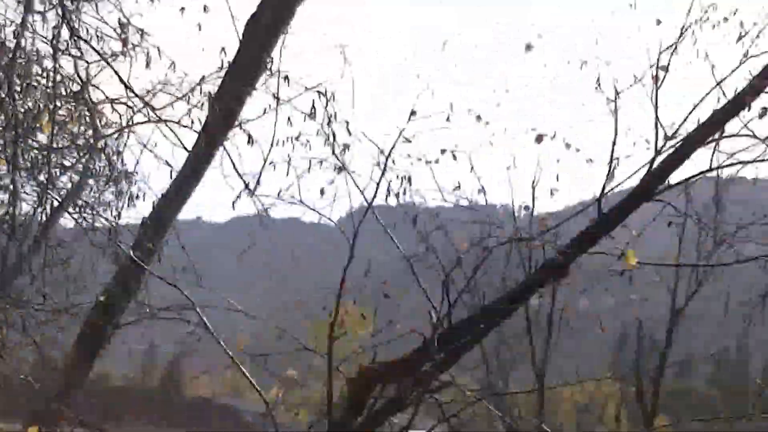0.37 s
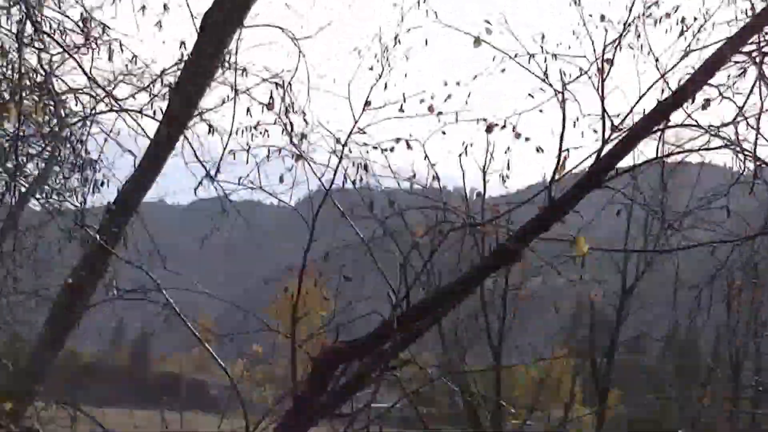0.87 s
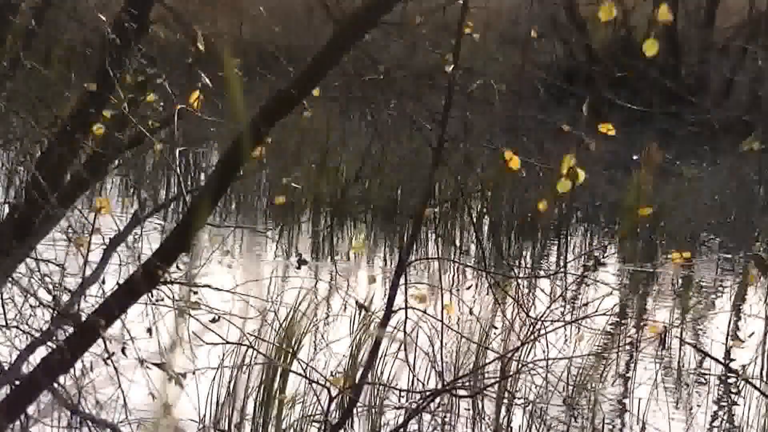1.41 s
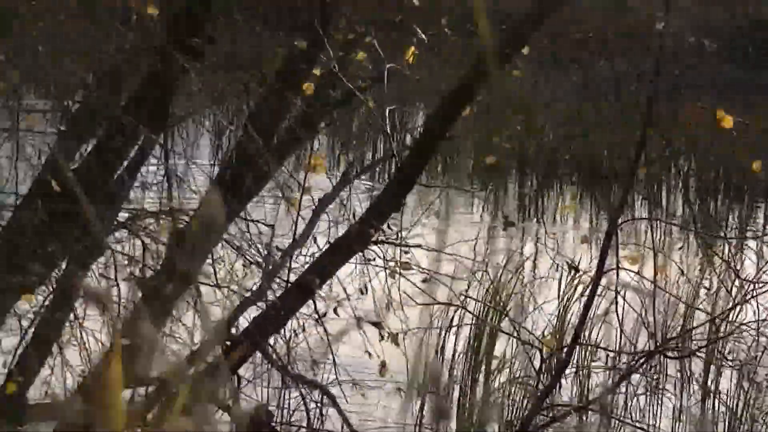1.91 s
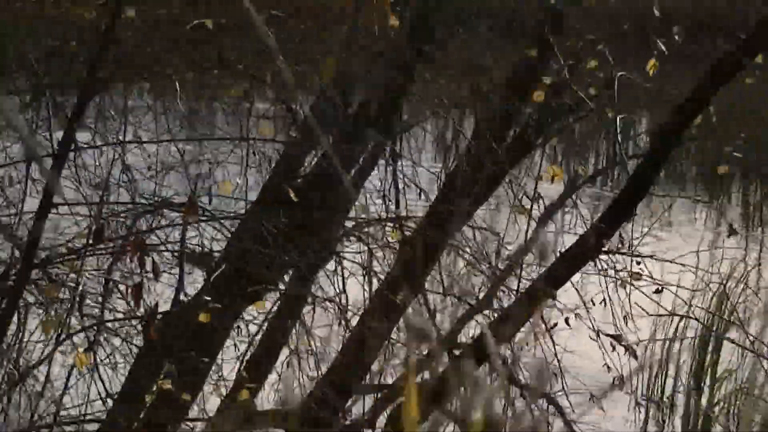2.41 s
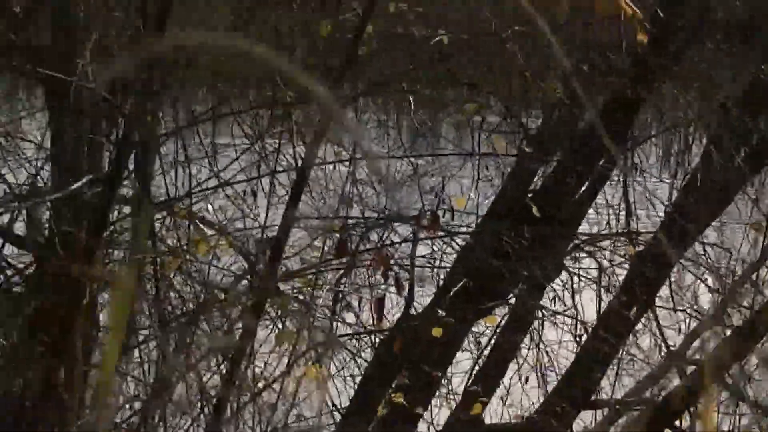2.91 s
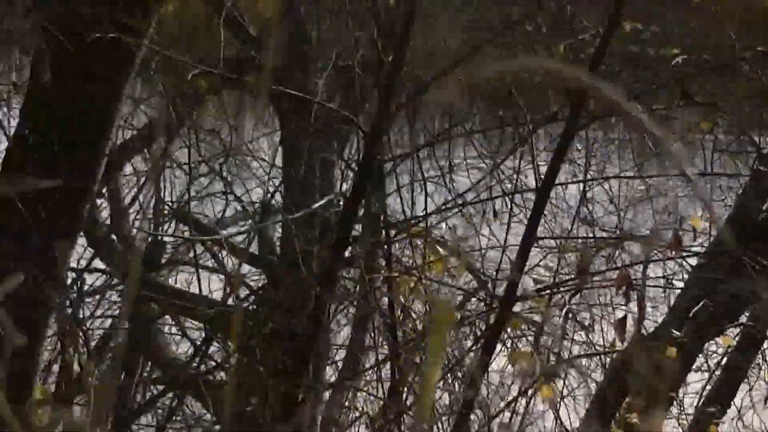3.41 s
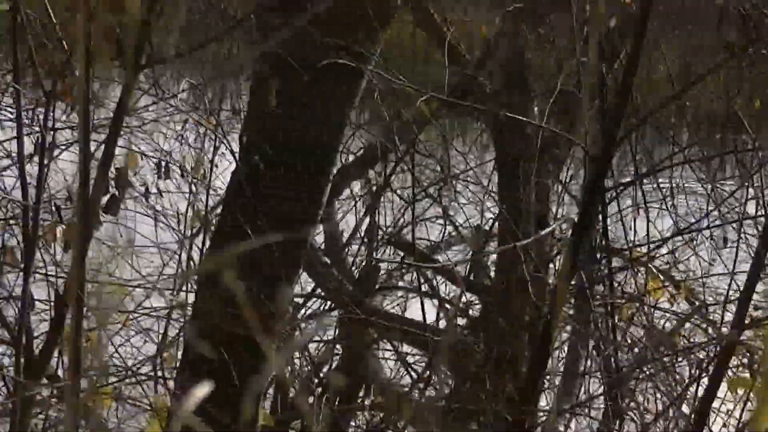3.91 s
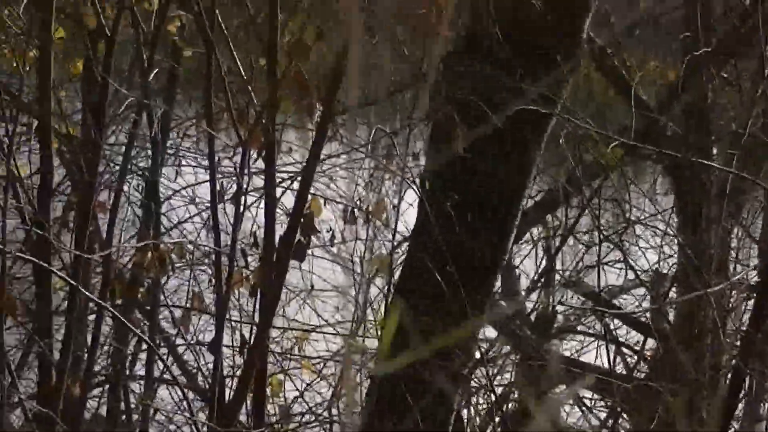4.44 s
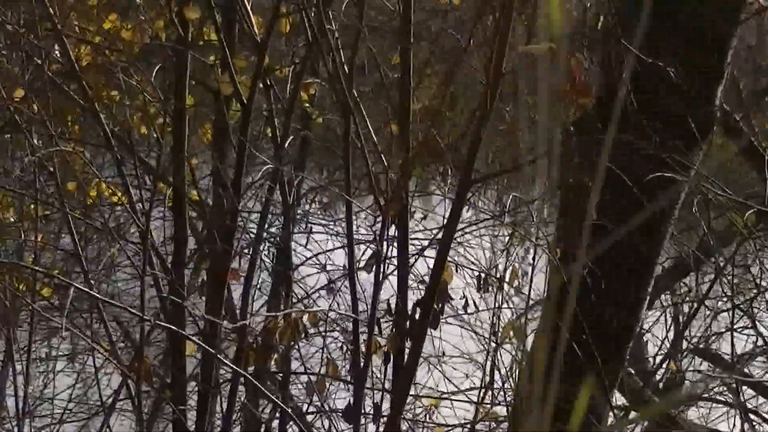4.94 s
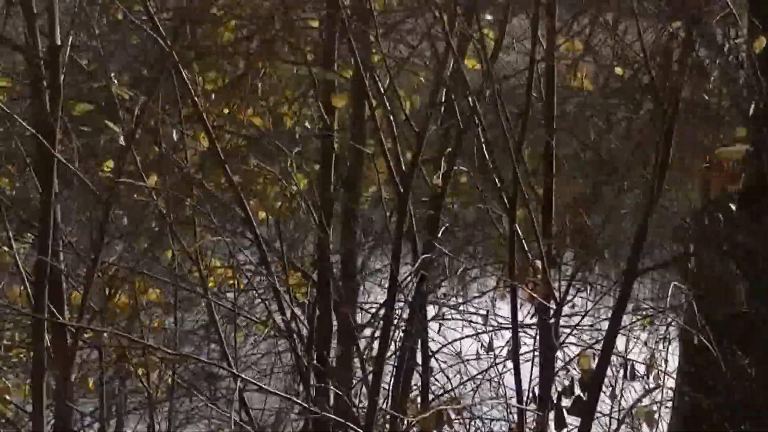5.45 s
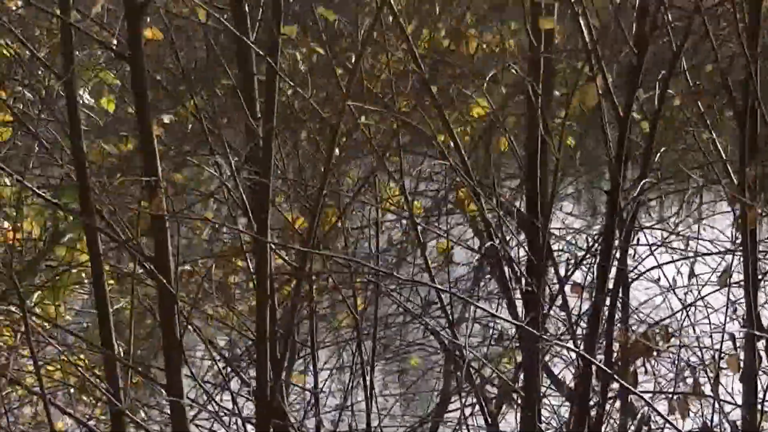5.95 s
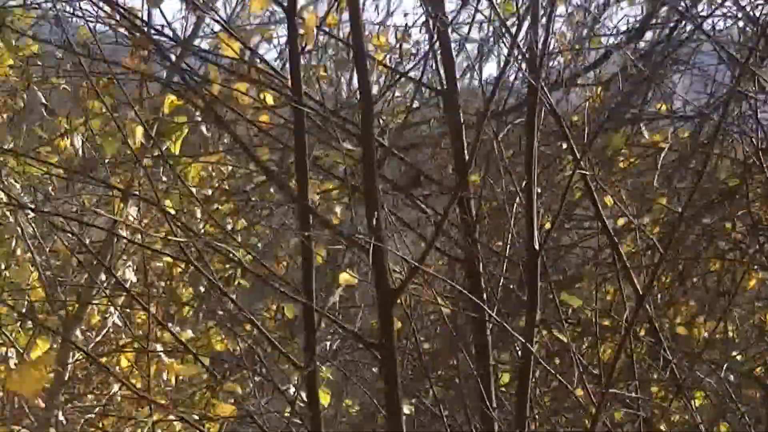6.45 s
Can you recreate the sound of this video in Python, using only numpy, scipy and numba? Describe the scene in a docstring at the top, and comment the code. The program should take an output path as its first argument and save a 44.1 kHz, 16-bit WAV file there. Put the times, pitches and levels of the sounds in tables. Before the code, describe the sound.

Low watery blips and brushing leaves, a few hoarse duck quacks, thin distant birdsong, and finally a close burst of crackling leaves and twigs.

```python
"""A walker pushes through dry brush beside a pond, over the hush of the valley: filtered noise and clicks.
At first low blips, perhaps splashes, ring in damped modes; low hollow pips tick ten a second as tone bursts,
then a duck gives short rasping quacks, pulses ringing throat and bill. A songbird follows with faint gliding
sines; at the end leaves rustle loudest, twigs snap in damped modes and a low thump sounds close by."""
import sys
import numpy as np
from scipy import signal
from scipy.fft import rfft, irfft
from scipy.io import wavfile
from scipy.ndimage import uniform_filter1d
from numba import njit

SR = 44100
rng = np.random.default_rng(int(sys.argv[2]) if len(sys.argv) > 2 else 0)


def transcribe(signal):
    """Save signal, clipped to [-1, 1], as a 16-bit WAV file at the path in sys.argv[1]."""
    frames = np.atleast_2d(signal).T
    limited = np.clip(frames, -1, 1)
    pcm = np.round(limited * 32767).astype(np.int16)
    wavfile.write(sys.argv[1], SR, pcm)


def field_ratio(decibels):
    """Amplitude ratio for a level in dB (20 dB per decade); scalars and array-likes work."""
    return 10 ** (np.asarray(decibels, dtype=float) / 20)


N = 290206  # samples
T = np.arange(N) / SR  # s


def at(table, hz):
    """Logarithmic frequency scale: reads a (f/Hz, level/dB) table."""
    f, db = np.transpose(table)
    return np.interp(np.log(hz), np.log(f), db)


def colour(x, table):
    """Spectral shaping: filters by a (f/Hz, level/dB) table without phase shift."""
    return irfft(rfft(x) * field_ratio(at(table, np.fft.rfftfreq(len(x), 1 / SR) + 1)), len(x))


def unit(x):
    """Normalization of power: scales to rms 1."""
    return x / np.sqrt(np.mean(x ** 2))


def band(x, lo_hz, hi_hz):
    """Band-pass filtering by a Butterworth response."""
    sos = signal.butter(2, [lo_hz, min(hi_hz, .45 * SR)], "band", fs=SR, output="sos")
    return signal.sosfilt(sos, x)


@njit
def resonate(x, hz, width):
    """Resonance: a state-variable band-pass with moving centre and width in Hz, gain 1 at the centre."""
    y, b, l = np.empty(len(x)), 0., 0.
    for i in range(len(x)):
        g, k = np.tan(np.pi * hz[i] / SR), width[i] / hz[i]
        v = (b + g * (x[i] - l)) / (1 + g * (g + k))
        b, l, y[i] = 2 * v - b, l + 2 * g * v, k * v
    return y


def walk(rate):
    """Slow random fluctuation: levels held 1 / rate s and slewed, rms 1."""
    k = int(SR / rate)
    held = np.repeat(rng.standard_normal(N // k + 1), k)
    return unit(uniform_filter1d(uniform_filter1d(held, k), k)[:N])


def add(out, s, x):
    """Superposition: mixes x into out from time s."""
    i = int(s * SR)
    out[i:i + len(x)] += x[:N - i]


def span(rows, fade_s):
    """Piecewise-linear contour: columns of a note at every sample, and a fade at both ends."""
    s, *columns = np.transpose(rows)
    t = np.arange(s[0], s[-1], 1 / SR)
    fade = np.clip(np.minimum(t - s[0], s[-1] - t) / fade_s, 0, 1)
    return [np.interp(t, s, c) for c in columns], fade


def scatter(x, t60):
    """Diffuse reflection off trunks, reeds and water: a decaying noise response of energy 1."""
    t = np.arange(int(t60 * SR)) / SR
    tail = rng.standard_normal(len(t)) * field_ratio(-60 * t / t60)
    return signal.fftconvolve(x, tail / np.sqrt(np.sum(tail ** 2)))[:N]


def crackle(rate, spread_db, top_db):
    """Random impulse process: clicks at a mean rate per s, mostly small and a few large, rms 1."""
    hit = rng.random(N) < rate / SR
    size = field_ratio(np.minimum(spread_db * rng.exponential(size=N), top_db))
    return unit(hit * rng.standard_normal(N) * size)


# spectrum of distant wind and water: f/Hz, relative level/dB per Hz
VALLEY_COLOUR = [(82, -62), (140, -5.5), (239, -4.5), (393, -7.5), (508, -1), (921, 0), (1510, -7.5),
                 (3480, -11), (4410, -11.5), (5070, -18), (10800, -28), (14200, -42), (16000, -57)]
VALLEY_DB = -56.5


def valley():
    """Broadband noise of distant wind and water: a smooth hush that drifts a little."""
    return field_ratio(VALLEY_DB + 0.34 * walk(2.72)) * unit(colour(rng.standard_normal(N), VALLEY_COLOUR))


LEAF_DB, STEM_DB = 1.5, 8.5  # balance of leaves and stems against treble at which the tilt is flat
AIR_DB, AIR_DB_PER_STEM_DB = -13.5, -0.5  # top octave, duller with thick stems


def brush_power(hz, leaf_db, stem_db):
    """Spectral balance: power in one band as stems (low), leaves (3.5 kHz) and the top octave count in it."""
    low = np.clip(np.log2(3500 / hz) / np.log2(3500 / 1200), 0, 1)
    top = np.clip(np.log2(hz / 3500), 0, 1)
    air = np.clip(np.log2(hz / 8000) / np.log2(12000 / 8000), 0, 1)
    tilt_db = low * (stem_db - STEM_DB) + (1 - low - top) * (leaf_db - LEAF_DB)
    return field_ratio(2 * (tilt_db + air * (AIR_DB + AIR_DB_PER_STEM_DB * stem_db)))


# spectrum of rustling leaves: f/Hz, relative level/dB per Hz
LEAF_COLOUR = [(180, -57), (300, -22), (337, -13), (614, -8.5), (774, 0.5), (1300, -1.5), (2360, -2.5),
               (2610, -7), (6620, -14.5), (14200, -27.5), (16000, -55)]
# steady brushing of the legs through the stems: t/s, relative treble level/dB,
# balance of thick stems near 1 kHz against treble/dB
WADING = [(0.0, -59, 13.5), (0.2, -64, 15.5), (0.44, -67.5, 16.5), (0.7, -65, 17.5), (0.95, -66.5, 8.5),
          (1.3, -68.5, 10.5), (1.7, -67.5, 2.5), (2.5, -66.5, 6.5), (2.7, -75, 3), (3.5, -89, 12),
          (4.0, -79.5, 20), (5.3, -89, -5), (5.6, -65, -7), (6.0, -61.5, 6), (6.15, -52, 8), (6.35, -52, 4),
          (6.44, -59.5, 4.5), (6.58, -66.5, 12)]
# single sweeps through the leaves: peak t/s, length/s, relative treble level/dB,
# balance of leaves near 3.5 kHz against treble/dB, balance of thick stems against treble/dB
SWEEPS = [(0.083, 0.12, -63.5, 18.5, 12), (0.13, 0.12, -67, 17, 21), (0.243, 0.12, -69.5, 13, 20),
          (0.317, 0.1, -68.5, 21, 21.5), (0.42, 0.18, -69.5, 18.5, 21.5), (0.51, 0.16, -56.5, 4.5, -2),
          (0.598, 0.1, -62, 9, 3), (0.744, 0.052, -65.5, 0, 25.5), (0.785, 0.058, -69, 0, 23),
          (0.908, .06, -61, -8, 6), (0.987, 0.096, -57, -10, 5), (1.27, 0.15, -62, 7.5, 7),
          (1.43, 0.067, -61.5, -7, -7), (1.505, 0.12, -60.5, -16, -9), (1.877, 0.039, -60.5, 5, -4),
          (1.919, 0.11, -57.5, 7.5, -1.5), (2.074, 0.094, -65, 5, 4), (2.11, 0.075, -71.5, -17, 20),
          (2.182, 0.23, -67.5, -27, 18), (2.34, 0.074, -68, 23, -2), (2.537, 0.11, -63.5, 11.5, -7),
          (2.872, 0.081, -65.5, 12.5, -18), (3.015, 0.13, -68.5, 13.5, -8), (3.074, 0.11, -60, 12.5, -14),
          (3.129, 0.094, -65.5, 16, -14), (3.453, 0.059, -57, 1, -15), (3.607, 0.51, -65.5, 2.5, 0.5),
          (3.768, .15, -69, 2, -6), (4.073, 0.096, -66, 14, -1), (4.234, 0.21, -73.5, 1, 21.5),
          (4.343, 0.13, -69.5, 13, 0), (4.646, 0.16, -63, 8, -10), (4.943, 0.21, -67.5, 2, 6),
          (5.438, 0.23, -60.5, 7, -0.5), (5.478, 0.086, -57.5, 7.5, 0), (5.515, 0.13, -65.5, 6.5, -10),
          (5.666, 0.057, -82, 9, -5), (5.774, 0.11, -50.5, 8.5, -0.5), (5.828, 0.036, -45, 2, -1),
          (5.955, 0.12, -51.5, 5, -4), (6.066, 0.11, -43, 4, 2.5), (6.132, 0.18, -40.5, 5, 4),
          (6.165, 0.062, -41, 5, 5), (6.209, 0.072, -40, 2, 0.5), (6.255, 0.023, -39, 2, -3),
          (6.303, 0.079, -46, -6, -6), (6.378, 0.023, -35.5, -24, -6.5), (6.485, 0.07, -48, 0, 3.5),
          (6.521, 0.05, -48, -5, 1.5), (6.548, .06, -55, 4, 9)]
SWEEP_RISE_SHARE = 0.49  # share of the length spent swelling
SWEEP_DEPTH_DB = 14.5  # how far below its peak a sweep starts and ends
WADING_LEAF_DB, BITS_OVER_HISS = 6, .8  # leaves against treble; amplitude ratio above 800 Hz


def brush():
    """Frictional noise and random impulses: leaves hiss and crackle, in all bands at once or only in one."""
    t = T[::32]
    s, wade_db, wade_stem_db = np.transpose(WADING)
    peak_s, length, db, leaf_db, stem_db = np.transpose(SWEEPS)[:, :, None]
    rising = (peak_s - t) / SWEEP_RISE_SHARE
    falling = (t - peak_s) / (1 - SWEEP_RISE_SHARE)
    away = np.maximum(rising, falling) / length
    sweeps = field_ratio(2 * (db - SWEEP_DEPTH_DB * away))
    wade = field_ratio(2 * np.interp(t, s, wade_db))
    stem_now_db = np.interp(t, s, wade_stem_db)
    wide = crackle(rate=1100, spread_db=9.0, top_db=23)
    surge, out = walk(45), 0
    for hz in 180 * 2 ** np.arange(0, 6.6, .5):
        cracks = min(hz / 2500, 1, 6000 / hz) * 0.3 * wide
        hiss = band(0.81 * rng.standard_normal(N) + cracks, hz / 2 ** 0.39, hz * 2 ** 0.29)
        # bits of leaf and stem ring briefly, each on its own pitch; small bits crack higher and more often
        clicks = crackle(rate=.45 * hz, spread_db=5, top_db=12)
        pitch = np.minimum(hz * 2 ** (.2 * walk(150)), .45 * SR)
        bits = band(resonate(clicks, pitch, hz / 9 + 0 * T), hz / 1.43, hz * 1.48)
        grain = unit(hiss) + min(hz / 800, 1) * BITS_OVER_HISS * unit(bits)
        power = wade * brush_power(hz, WADING_LEAF_DB, stem_now_db)
        power = power + np.sum(sweeps * brush_power(hz, leaf_db, stem_db), axis=0)
        # a density per Hz becomes a level per band, which grows with frequency
        colour_db = at(LEAF_COLOUR, hz) + 10 * np.log10(hz / 7000) + 0.93 * surge + 0.84 * walk(25)
        out = out + np.interp(T, t, np.sqrt(power)) * field_ratio(colour_db + 11.0) * unit(grain)
    return out


# low ringing blips before 0.6 s, perhaps splashes, and later snapping twigs: t/s, peak level/dB,
# pitch f/Hz, brightness of the crack/dB (counts twice)
SNAPS = [(0.009, -31, 1080, -21), (0.049, -28.5, 1460, -26), (0.061, -29, 1480, -24),
         (0.066, -26, 1540, -27), (0.07, -26, 1770, -25), (0.075, -28, 1030, -22), (0.083, -30, 1240, -20),
         (0.105, -29, 1290, -26), (0.132, -32, 1430, -22), (0.138, -28, 1870, -27), (0.147, -30, 1240, -26),
         (0.179, -34, 1210, -22), (0.213, -35, 830, -26), (0.244, -36, 1270, -22), (0.274, -36, 842, -20),
         (0.296, -36, 1870, -22), (0.328, -33, 1180, -23), (0.359, -37, 947, -23), (0.431, -31, 1330, -13),
         (0.437, -32, 1190, -21), (0.443, -27.5, 1180, -31), (0.46, -34, 950, -21), (0.554, -37, 1380, -20),
         (0.576, -34, 1880, -21), (0.916, -40, 1500, -20), (2.315, -39, 3280, -19), (3.004, -38, 4470, -18),
         (3.44, -37, 3100, -22), (3.864, -39, 2700, -32), (3.867, -43, 1700, -32), (4.054, -44, 4200, -24),
         (4.065, -42, 3600, -22), (4.074, -39, 3100, -24), (4.676, -46, 3900, -20), (4.916, -39, 2650, -26),
         (4.919, -42, 2300, -26), (5.1, -47, 5200, -18), (5.128, -28, 4240, -16), (5.135, -44, 2800, -18),
         (5.193, -46, 2200, -18), (5.599, -19, 4300, -16), (5.61, -41, 3770, -13), (5.62, -38, 1350, -18),
         (5.636, -42, 821, -7), (5.656, -29, 3470, -17), (5.667, -35, 4080, -16), (5.671, -40, 2910, -14),
         (5.708, -38, 4050, -18), (5.73, -37, 4300, -18), (5.737, -27, 5000, -13), (5.804, -26, 1660, -18),
         (5.825, -31, 1790, -15), (5.85, -35, 1920, -26), (5.853, -37, 2300, -26), (5.865, -40, 2200, -22),
         (5.885, -39, 2260, -20), (5.889, -37, 2300, -26), (5.912, -36, 4100, -18), (5.945, -33, 1860, -15),
         (5.978, -29, 2420, -19), (6.021, -27, 2200, -22), (6.026, -27, 2100, -26), (6.033, -28, 1400, -20),
         (6.046, -26, 4000, -16), (6.056, -23, 1500, -24), (6.059, -17, 1670, -25), (6.075, -20, 1500, -23),
         (6.084, -27, 1500, -20), (6.118, -20, 2520, -16), (6.121, -18, 2600, -22), (6.146, -22, 1800, -20),
         (6.154, -21, 2500, -22), (6.178, -9, 4900, -14), (6.1785, -24, 1300, -20), (6.192, -26, 2460, -12),
         (6.203, -25, 1800, -12), (6.212, -17, 2500, -12), (6.224, -27, 1500, -14), (6.246, -27, 4600, -16),
         (6.252, -19, 2150, -15), (6.256, -24, 2300, -22), (6.267, -26, 1570, -15), (6.281, -28, 1710, -14),
         (6.301, -28, 1670, -17), (6.349, -28, 2440, -15), (6.367, -28, 1900, -8), (6.377, -20, 2370, -16),
         (6.386, -24, 2170, -8), (6.392, -28, 2300, -10), (6.4122, -11, 2500, -16),
         (6.4163, -6.5, 3170, -17), (6.428, -35, 2330, -14), (6.462, -30, 2540, -20)]
# modes of each blip or snap: multiple of its pitch, mean level/dB, share of the ring time
SNAP_MODES = [(.5, -15, 1.4), (.72, -11, 1.0), (1.0, 0, .6), (1.3, -7, .5), (1.7, -10, .4), (2.2, -14, .35)]
RING_CYCLES = 30.0  # cycles at the pitch in 60 dB of decay, before each mode's share
BREAK_CYCLES, BREAK_DB_PER_OCTAVE = 7, 6  # one short pulse at the pitch, stronger in high snaps
CRACK_DB = 17  # added to the brightness of all cracks


def blips_and_snaps():
    """Modal vibration: damped modes ring for a few cycles; a bright crack leads, noisy splinters follow."""
    out, t = np.zeros(N), np.arange(int(.03 * SR)) / SR
    for s, db, hz, crack_db in SNAPS:
        chance = rng.standard_normal(len(t))
        t60 = RING_CYCLES / hz  # higher ones ring shorter
        ring = 0
        for (multiple, mode_db, share), r in zip(SNAP_MODES, chance):
            mode_hz = hz * multiple * (1 + 0.16 * r * abs(multiple - 1))
            ring = ring + field_ratio(mode_db + 2.0 * r - 60 * t / (t60 * share)) * np.sin(2 * np.pi * mode_hz * t)
        ring = ring * -np.expm1(-t * hz / .8)  # the ring builds up within about a cycle
        splinters = unit(band(chance, hz / 1.5, hz * 1.5)) * field_ratio(-13 - 60 * t / (2 * t60))
        high_db = BREAK_DB_PER_OCTAVE * np.log2(hz / 1500)
        give = np.sin(2 * np.pi * hz * t) * field_ratio(-60 * t * hz / BREAK_CYCLES + high_db)
        give = give * -np.expm1(-t * hz / .25)
        crack = np.sin(2 * np.pi * 5200 * t) + 0.45 * np.sin(2 * np.pi * 8300 * t)
        crack = field_ratio(2 * (crack_db + CRACK_DB) + high_db - 60 * t / 0.0016) * crack
        snap = ring / np.abs(ring).max() + splinters + 2 * give + crack
        snap = band(snap, max(700., hz / 2.22), 9800.0)
        add(out, s + .0007, field_ratio(db) * snap / np.abs(snap).max())
    return out


# low hollow pips: t/s (3 ms after the onset), level/dB, f/Hz
PIPS = [(0.212, -50, 415), (0.339, -53, 408), (0.48, -46, 423), (0.584, -46, 433), (0.683, -46, 402),
        (0.772, -43.5, 395), (0.865, -48, 444), (0.964, -46.5, 412), (1.053, -50, 416), (1.155, -46, 422),
        (1.248, -50, 450), (1.344, -59, 480)]


def pips():
    """Tone bursts under a rounded envelope, with a faint octave and narrow-band noise for hoarseness."""
    out, t = np.zeros(N), np.arange(int(.05 * SR)) / SR
    shape = t / 0.0051 * np.exp(1 - t / 0.0049)
    for s, db, hz in PIPS:
        hoarse = unit(band(rng.standard_normal(len(t)), 300., 900.))
        tone = np.sin(2 * np.pi * hz * t) + .3 * np.sin(4 * np.pi * hz * t) + .45 * hoarse
        add(out, s - .003, field_ratio(db) * shape * tone)
    return out


def bill_ring(x, hz, width):
    """Cascaded resonance: two band-passes in series, made up in level for a narrow width/Hz."""
    first = resonate(x, hz + 0 * T, 2 * width + 0 * T)
    return resonate(first, hz + 0 * T, width + 0 * T) * np.sqrt(SR / 1.6 / width)


# bursts of voice, one or two to a quack, each a list of rows: t/s, pulse rate f/Hz, effort level/dB,
# mean bill resonance f/Hz, gape as drive of the upper resonance over the bill level/dB
QUACKS = [
    [(0.636, 179.7, -49, 1680, -3), (0.645, 184, -43.5, 1560, -3), (0.667, 178.3, -41, 1720, -7),
     (0.674, 180, -46, 1850, -3), (0.688, 184, -40.5, 2000, -1), (0.697, 184, -45, 2000, -2),
     (0.705, 191, -67, 1880, 1)],
    [(1.1265, 134.4, -51.5, 1830, -4), (1.148, 136.9, -45.5, 1900, 0.5), (1.164, 139.3, -44, 1990, 0),
     (1.172, 174, -41, 1890, 5), (1.181, 186, -40, 1850, -3), (1.192, 194.5, -38.5, 1840, -3),
     (1.202, 194.6, -43, 1840, -6), (1.213, 194, -39, 1870, -12), (1.23, 191, -57, 1740, 6),
     (1.245, 190, -59, 1760, -1)],
    [(1.659, 119, -47, 2000, -18), (1.68, 119, -45.5, 1770, -20), (1.688, 127.6, -53, 1690, -14),
     (1.712, 131.5, -58, 1740, -14)],
    [(1.726, 175, -51, 1830, -12), (1.742, 173.4, -43, 1860, -11), (1.75, 172.4, -40, 1960, -3),
     (1.757, 172, -43, 1900, -12), (1.763, 171, -53, 1890, -13)],
    [(1.769, 169, -45.5, 1970, -1.5), (1.781, 167, -42, 1930, -26), (1.793, 164, -54, 1820, -12),
     (1.812, 157, -54, 1770, -3)],
    [(2.3835, 118, -56, 2020, -10), (2.392, 121.4, -51, 2020, -10), (2.401, 118, -60, 2020, -5)],
    [(2.413, 121, -46, 1980, -19), (2.422, 123, -56, 1970, -12), (2.436, 122, -57, 1950, -10)],
    [(2.445, 145, -48, 1950, -12), (2.457, 155, -49, 1930, -10), (2.468, 125, -52, 1950, -8),
     (2.476, 185, -47, 1980, -7), (2.484, 180, -46, 1980, -7), (2.492, 140, -49, 1880, -9),
     (2.5, 130, -51, 1900, -7), (2.515, 130, -65, 1900, -4)],
]
# upper resonance of the bill, for each burst of voice: f/Hz
UPPER_HZ = [2260, 2285, 2500, 2580, 2650, 2400, 2460, 2650]
# drive of the throat over the bill at an effort of -45 dB, for each burst of voice: level/dB
THROAT_DB = [-4.5, -8, -8, -5.5, -10, -4, -4, -5]
THROAT_HZ, THROAT_DB_PER_DB = 800, -0.4  # a louder voice hides the throat


def duck():
    """Source and filter: uneven pulses of the voice box ring the throat and two resonances of the bill."""
    s, *columns = np.vstack(QUACKS).T
    rate, db, bill_hz, upper_db = (np.interp(T, s, c) for c in columns)
    voiced = np.any([(T >= rows[0][0]) & (T <= rows[-1][0]) for rows in QUACKS], axis=0)
    burst = np.maximum(np.searchsorted([rows[0][0] for rows in QUACKS], T) - 1, 0)
    throat_db = np.array(THROAT_DB)[burst] + THROAT_DB_PER_DB * (db + 45)
    cycles = np.cumsum(rate * voiced) / SR
    # every burst of voice opens with a pulse
    opened = np.maximum.accumulate(np.where(voiced, 0, cycles))
    starts = np.flatnonzero(np.diff(np.ceil(cycles - opened)) > 0)
    late, uneven = rng.standard_normal((200, 2))[:len(starts)].T
    pulses = np.zeros(N)
    pulses[starts + (.00012 * SR * late).astype(int)] = field_ratio(1.4 * uneven) * np.sqrt(SR / rate[starts])
    air = (pulses + .2 * rng.standard_normal(N) * voiced) * field_ratio(db)
    # a tighter, faster voice rings the bill longer
    bill_width = np.interp(rate, [175, 193], [260, 180])
    bill_hz = bill_hz * (1 + .03 * walk(150))  # the bill trembles from pulse to pulse
    out = bill_ring(air, bill_hz, bill_width)
    out += bill_ring(air * field_ratio(upper_db), np.array(UPPER_HZ)[burst], 1.3 * bill_width)
    out += bill_ring(air * field_ratio(throat_db), THROAT_HZ, 300.0)
    # weak rasp between and above
    out += field_ratio(-8.5) * bill_ring(air, 1330.0, 410.0) + field_ratio(-19.0) * bill_ring(air, 3300.0, 610.0)
    return out + field_ratio(-9) * scatter(out, t60=.08)


# pure songbird slurs: start t/s, length/s, first f/Hz, last f/Hz, rms level at the peak/dB
SLURS = [(1.485, 0.017, 3880, 3543, -58.5), (2.137, 0.042, 4387, 3350, -57.5),
         (3.258, 0.026, 4220, 4452, -63), (3.476, 0.052, 4250, 3200, -59.5),
         (3.609, 0.053, 4290, 2950, -56.5), (3.735, 0.06, 4370, 2960, -56),
         (3.873, 0.052, 4289, 2960, -58.5), (4.26, 0.06, 4130, 3020, -67),
         (4.422, 0.051, 4350, 3100, -61.5), (4.78, 0.03, 4204, 4440, -70), (3.503, 0.02, 4350, 4440, -66),
         (3.53, .03, 3420, 4200, -67), (4.54, .018, 3700, 3980, -65), (5.033, 0.042, 4000, 4320, -75),
         (5.178, 0.034, 4000, 4300, -73)]
# notes with a bending pitch, two of them with a clear octave, each a list of rows:
# t/s, f/Hz, rms level/dB, rms level of the octave/dB
BENDS = [
    [(3.927, 2280, -65, -90), (3.946, 2500, -65.5, -90), (3.97, 2570, -66, -90), (3.995, 2530, -66, -90),
     (4.016, 2200, -65, -90)],
    [(4.178, 2700, -63, -90), (4.195, 2950, -60, -90), (4.207, 3230, -54, -90), (4.218, 3300, -55, -90),
     (4.229, 3320, -54, -90), (4.234, 3300, -66, -90)],
    [(4.548, 2740, -68, -90), (4.558, 2250, -65, -90), (4.575, 1940, -66, -90)],
    [(4.553, 1380, -85, -62), (4.563, 1805, -71, -56), (4.572, 1914, -71, -56), (4.59, 2025, -61, -56),
     (4.604, 2420, -64, -58.5), (4.612, 3010, -50, -78), (4.62, 3200, -60, -80), (4.64, 3350, -63, -85)],
    [(4.638, 2714, -51, -78), (4.65, 2470, -58, -75), (4.662, 2315, -58, -58), (4.68, 2265, -57, -54),
     (4.69, 2265, -59, -63), (4.708, 2310, -57, -56), (4.718, 2290, -56, -63), (4.732, 2280, -61, -63),
     (4.745, 2280, -68, -68), (4.765, 2270, -85, -71)],
    [(4.752, 2200, -71, -91), (4.772, 2580, -68, -91), (4.798, 2860, -55.5, -86), (4.825, 2893, -49, -83),
     (4.852, 2900, -54.5, -85), (4.897, 2800, -68, -84)],
]
SLUR_PEAK_SHARE, SLUR_START_DB, SLUR_END_DB = 0.39, -3, -2  # swell, ends relative to the peak
SLUR_EASE = 0.827  # the glide slows towards its end


def songbird():
    """Frequency modulation: gliding sines, far off and a little wet."""
    out = np.zeros(N)
    waver = 2.3 * walk(120)  # dB, the air between shakes the far tone
    for s, length, first_hz, last_hz, db in SLURS:
        u = np.arange(0, length, 1 / SR) / length
        hz = first_hz + (last_hz - first_hz) * np.expm1(-SLUR_EASE * u) / np.expm1(-SLUR_EASE)
        swell_db = np.interp(u, [0, SLUR_PEAK_SHARE, 1], [SLUR_START_DB, 0, SLUR_END_DB])
        fade = np.clip(np.minimum(u, 1 - u) * length / 0.0014, 0, 1)
        level = np.sqrt(2) * field_ratio(db + swell_db + waver[int(s * SR):][:len(u)])
        add(out, s, fade * level * np.sin(2 * np.pi * np.cumsum(hz) / SR))
    for rows in BENDS:
        s = rows[0][0]
        (hz, *partial_db), fade = span(rows, fade_s=.0015)
        phase = 2 * np.pi * np.cumsum(hz) / SR
        note_waver = waver[int(s * SR):][:len(hz)]
        for k, db in enumerate(partial_db, start=1):
            add(out, s, fade * np.sqrt(2) * field_ratio(db + note_waver) * np.sin(k * phase))
    return out + field_ratio(-5) * scatter(out, t60=.2)


THUMP_S, THUMP_HZ, THUMP_DB = 6.176, 90, -33  # sounds with a loud, bright twig snap


def thump():
    """Damped oscillation: a low thump as one fast-decaying sine."""
    out, t = np.zeros(N), np.arange(int(.03 * SR)) / SR
    add(out, THUMP_S, field_ratio(THUMP_DB - 60 * t / 0.037) * np.sin(2 * np.pi * THUMP_HZ * t))
    return out


# stereo width of far sounds: f/Hz, side over mid level/dB
FAR_WIDTH = [(60, -3), (110, -5), (200, -2.5), (380, -13.5), (700, -11), (1290, -5.5), (2380, -4.5),
             (4400, -7.5), (8120, -7), (15000, -20)]
# stereo width of near sounds: f/Hz, side over mid level/dB
NEAR_WIDTH = [(200, -21), (700, -26), (1500, -29), (3000, -20), (6000, -20), (9000, -36), (13000, -16)]
CALL_WIDTH_DB = -16  # the duck is a single close point, narrower than the hush


def spread(near, call, hush):
    """Partial coherence: two close microphones differ by the same colours in unrelated phase."""
    side = colour(hush + field_ratio(CALL_WIDTH_DB) * call, FAR_WIDTH) + colour(near, NEAR_WIDTH)
    frames = signal.stft(side, nperseg=256)[2]
    random_phase = np.exp(2j * np.pi * rng.random(frames.shape))
    diffuse = signal.istft(frames * random_phase, nperseg=256)[1][:N]
    mid = near + call + hush
    side = diffuse + (field_ratio(-.4 / 2) - 1) * mid  # sets the left about 0.4 dB below the right
    return np.array([mid + side, mid - side])


def scene():
    """Superposition of near and far sources, heard by two close microphones."""
    hush = valley()
    near = brush() + blips_and_snaps() + thump()
    hush = hush + pips()
    call = duck()
    hush = hush + songbird()
    return spread(near, call, hush)


def low_pass(x):
    """Removes everything above the highest recorded frequency."""
    return signal.sosfilt(signal.butter(12, 16480, fs=SR, output="sos"), x)


MIC_CUT_HZ, TOP_HZ = 381, 15900
RUMBLE_DB, TREBLE_HISS_DB = -95.5, -89  # rms of each channel's own rumble; hiss before its band-pass


def record(dry):
    """Linear filtering and additive noise: a wind filter cuts the bass, preamps add rumble and hiss."""
    cut = signal.sosfilt(signal.butter(3, MIC_CUT_HZ, "high", fs=SR, output="sos"), dry)
    shared, *own = (unit(band(n, 10., 150.)) for n in rng.standard_normal((3, N)))
    rumble = field_ratio(RUMBLE_DB) * (0.36 * shared + np.array(own))
    hiss = field_ratio(TREBLE_HISS_DB) * band(rng.standard_normal((2, N)), 8000., 15000.)
    top_cut = signal.ellip(8, .2, 60, TOP_HZ, fs=SR, output="sos")
    mix = signal.sosfilt(top_cut, cut + rumble + hiss)
    return low_pass(mix)


dry = scene()
out = record(dry)
transcribe(out)
```